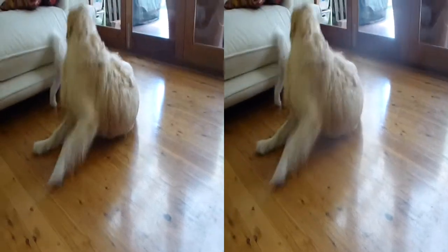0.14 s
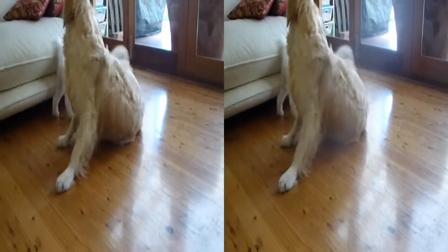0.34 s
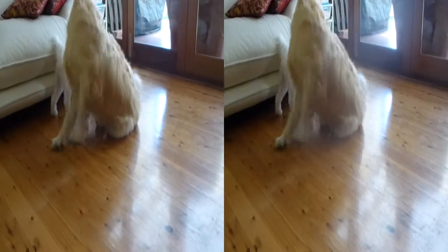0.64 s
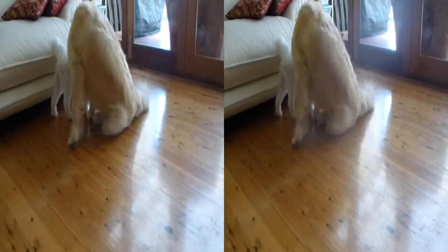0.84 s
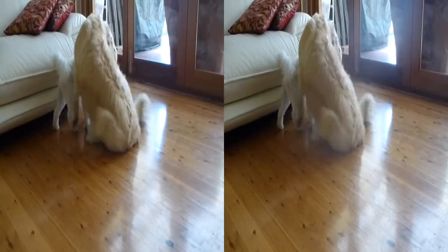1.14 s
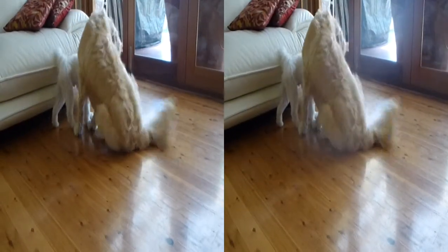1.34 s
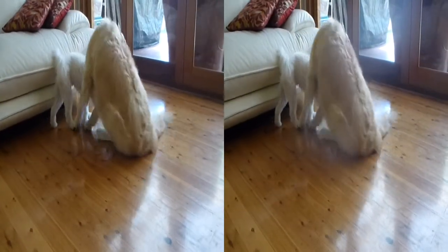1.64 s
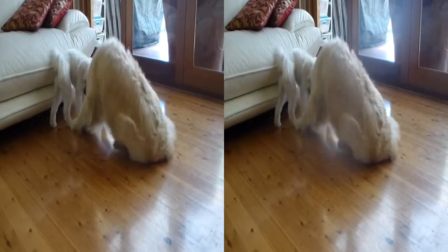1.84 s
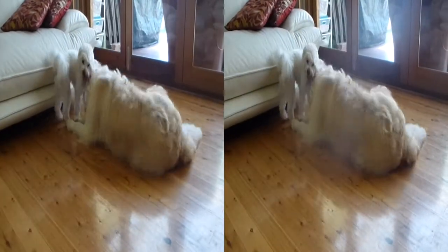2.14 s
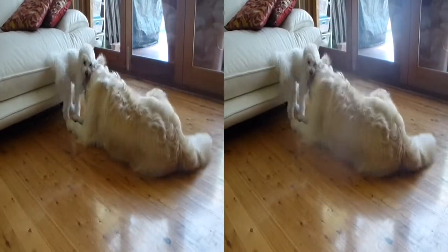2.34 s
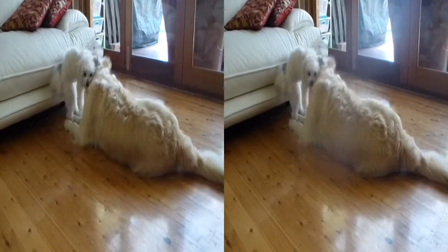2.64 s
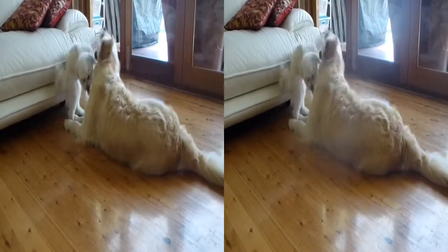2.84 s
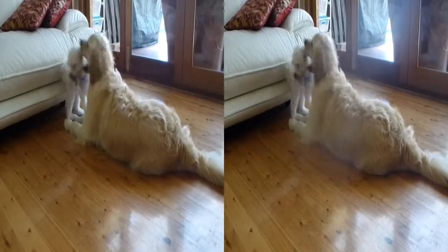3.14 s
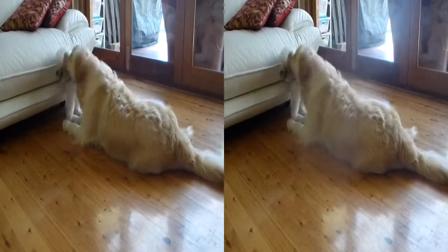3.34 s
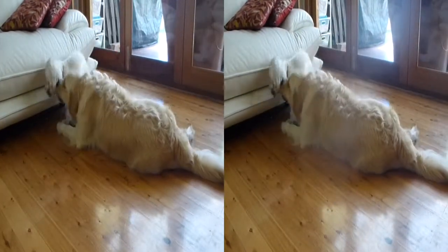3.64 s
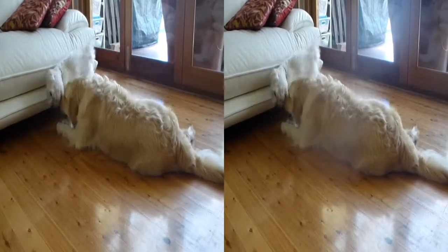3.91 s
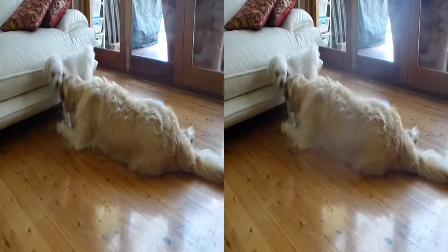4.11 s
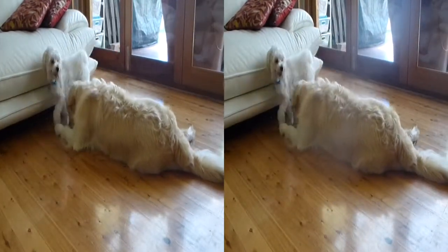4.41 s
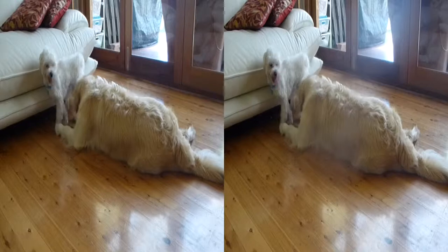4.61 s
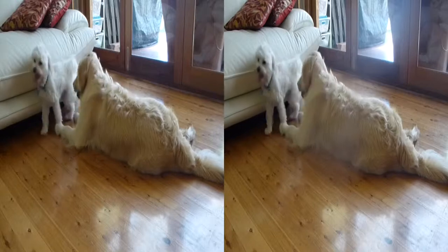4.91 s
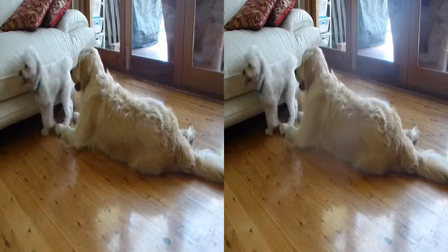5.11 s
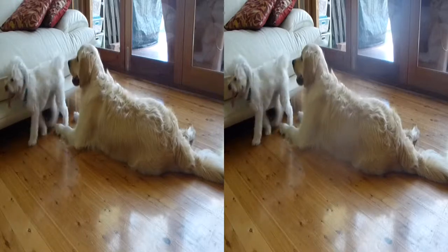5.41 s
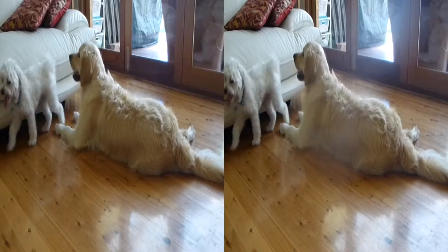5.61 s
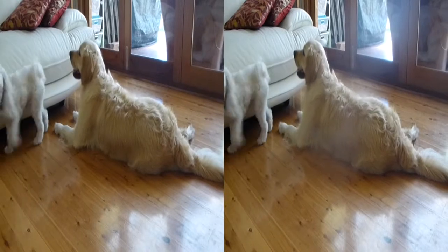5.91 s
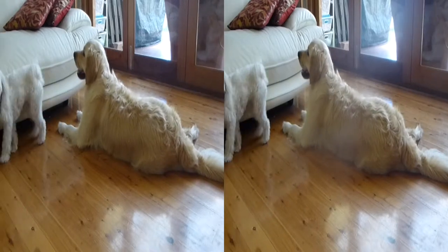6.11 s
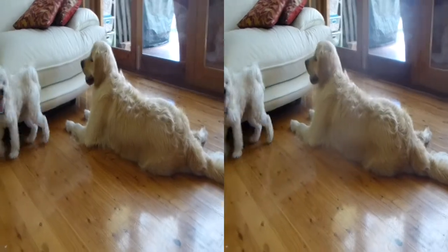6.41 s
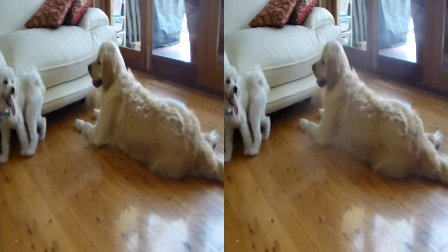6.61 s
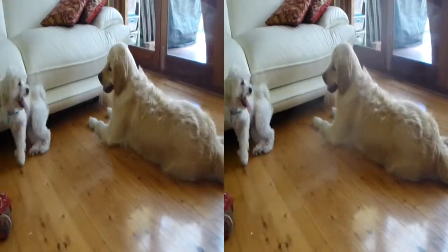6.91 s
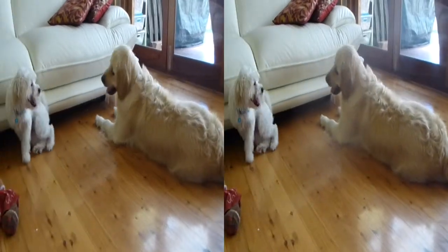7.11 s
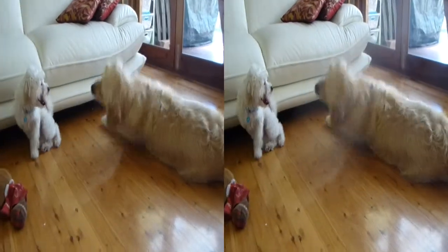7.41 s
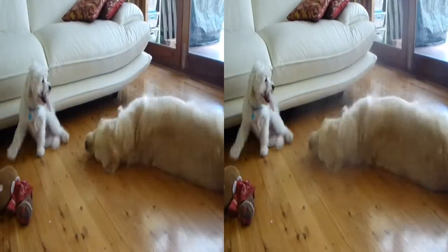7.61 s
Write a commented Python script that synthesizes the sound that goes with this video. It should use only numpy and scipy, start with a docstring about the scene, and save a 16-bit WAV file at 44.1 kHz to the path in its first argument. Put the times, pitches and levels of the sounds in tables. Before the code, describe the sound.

A handheld camera in a lively living room picks up dog claws scratching boards, coarse fur brushing, pad squeaks and dull thuds a few metres away. A thin collar tag tinkles and a dog pants softly in the calmer middle. Something loose clatters on the housing, briefly at the start and near one second, then in dense, very loud bursts at the end. Steady hiss and faint ticking lie beneath.

```python
"""Two dogs scuffle on a wooden living-room floor: claws skid as decaying noise and grit through board resonances,
fur slides as patchy coloured noise, pads squeak and thud, one dog pants up to 6.2 s, a collar tag tinkles.
Right at the hand-held camera, something loose, likely a dangling cap or buckle, chatters on the housing:
these knocks, bright ticks with ringing modes, rebounds and later a low rumble, are the loudest sounds.
Behind lie the room's tail, a dull tick of the camera's drive and hush; the camera widens the stereo picture."""
import sys
import numpy as np
from scipy import signal
from scipy.fft import rfft, irfft
from scipy.io import wavfile
from scipy.ndimage import uniform_filter1d

SR = 44100
rng = np.random.default_rng(int(sys.argv[2]) if len(sys.argv) > 2 else 0)


def store_wav(level_fs):
    """Save 16-bit WAV to argv[1]."""
    pcm = np.round(np.clip(np.atleast_2d(level_fs), -1, 1) * 32767)
    wavfile.write(sys.argv[1], SR, pcm.T.astype(np.int16))


N = 341775  # samples


def gain_of(db):
    """Decibels to amplitude gain."""
    return 10 ** (np.asarray(db) / 20)


def evened(x):
    """Scales to rms 1."""
    return x / np.sqrt(np.mean(x ** 2) + 1e-20)


def read(points, hz):
    """Interpolates (Hz, value) points on a log-frequency axis."""
    point_hz, value = np.transpose(points)
    return np.interp(np.log(hz + 1), np.log(point_hz + 1), value)


def add(mix, s, sound):
    """Mixes a sound in at s seconds, cut at the end of the mix."""
    part = mix[..., round(s * SR):][..., :sound.shape[-1]]
    part += sound[..., :part.shape[-1]]


def resonate(x, hz, width):
    """One damped resonance, with a decaying complex pole, of gain about 1 at its centre."""
    r = np.exp(-np.pi * width / SR)
    return 2 * signal.lfilter([1 - r], [1, -r * np.exp(2j * np.pi * hz / SR)], x).real


def resonate_twice(x, hz, width):
    """Two equal resonances in a row, for steeper skirts."""
    return resonate(resonate(x, hz, width), hz, width)


def coloured(x, db_of, size=256):
    """Filters in short-time spectra by the gain db_of(Hz, s)."""
    overlap = size * 3 // 4
    hz, t, z = signal.stft(x, SR, nperseg=size, noverlap=overlap)
    shaped = z * gain_of(db_of(hz[:, None], t))
    return signal.istft(shaped, SR, nperseg=size, noverlap=overlap)[1][..., :x.shape[-1]]


def grit(per_s, spread_db):
    """Random clicks, a few of them large, as rough surfaces catch and let go."""
    clicks = rng.standard_normal(N) * (rng.random(N) < per_s / SR)
    return clicks * gain_of(spread_db * np.minimum(rng.exponential(1, N), 4))


def swells(rows, rise_db_per_s, fall_db_per_s):
    """Sum of gain curves: each row (start, dB, hold) rises up to its start, holds and falls, straight in dB."""
    t = np.arange(N) / SR
    total = np.zeros(N)
    for s, db, hold, *_ in rows:
        rise = rise_db_per_s * np.maximum(s - t, 0)
        fall = fall_db_per_s * np.maximum(t - s - hold, 0)
        total += gain_of(db - rise - fall)
    return total


def rub(gain, tilt, colour, grain, per_s, patchy_db):
    """Noise and grit under a gain curve, coloured, tilted by (s, dB per octave) and patchy."""
    smooth = (1 - grain) * rng.standard_normal(N)
    drive = smooth + grain * evened(grit(per_s, 3.4))
    # slow random level changes, each in a narrow band
    patches = uniform_filter1d(rng.standard_normal((129, N // 64 + 3)), size=2, axis=0)
    patches = evened(uniform_filter1d(patches, size=16, axis=1))

    def db_of(hz, t):
        slope = np.clip(np.interp(t, *tilt), -3, 5) * np.log2((hz + 200) / 2500)
        return read(colour, hz) + slope + patchy_db * patches[:, :len(t)]

    return evened(coloured(drive, db_of)) * gain


# Paws and claws landing and skidding on the boards.
# Each row: start in seconds, level in dB, favoured frequency in Hz, dying time t60 in seconds.
SKIDS = [(0.303, -37.5, 925, 0.37), (0.485, -43.5, 1290, 0.6), (0.72, -47, 2480, 0.17),
         (0.732, -27.5, 1750, 0.18), (.75, -33, 1470, 0.54), (0.893, -35, 1240, 0.62),
         (1.022, -44, 1560, 1), (1.324, -37, 1500, 0.48), (1.556, -52, 800, 0.63),
         (1.898, -38.5, 4940, 0.59), (1.963, -39, 3980, 0.065), (2.993, -44.5, 3120, 0.52),
         (3.058, -50, 1310, 0.38), (3.449, -53, 606, 1), (3.839, -43, 5900, 0.12), (5.903, -44, 850, 0.052),
         (6.079, -44.5, 950, 0.09), (6.102, -46, 1420, 0.073)]
# Resonances of the floorboards under the claws.
# Each row: frequency in Hz, base width in Hz (broadened in the formula below), level in dB.
BOARDS = [(1130, 150, 14), (2090, 19, 14.5), (2820, 58, 8), (3900, 17, 13), (4950, 72, 9), (6560, 120, -3)]
# skids softer than this are duller; brightness in dB per octave
HARD_SKID_DB, DULLING_PER_DB, BRIGHT_PER_OCTAVE = -40.5, 0.28, 0.91


def skids():
    """A hard contact, then grit that dies away; boards ring under it, and each skid favours its own band."""
    out, size = np.zeros(N), 16384
    hz, t = np.fft.rfftfreq(size, 1 / SR), np.arange(size) / SR
    boards = 0.022
    for board_hz, width, db in BOARDS:
        boards = boards + gain_of(db) / np.sqrt(1 + (2 * (hz - board_hz) / (3.7 * width + 90)) ** 2)
    rough = 0.95 * rng.standard_normal(N) + 0.78 * evened(grit(3500, 1.8))
    low_cut = hz ** 2 / (hz ** 2 + 300 ** 2)
    for s, db, peak_hz, t60 in SKIDS:
        dulling = DULLING_PER_DB * min(db - HARD_SKID_DB, 0)
        tilt = min(dulling + BRIGHT_PER_OCTAVE * np.log2(peak_hz / 2000), 2)
        contact = 1.6 * np.exp(-t / 0.0017)
        scrape = gain_of(-60 * t / max(t60, .01))
        stroke = np.roll(rough, -round(s * SR))[:size] * (scrape + contact) * (1 - np.exp(-t / 0.00059))
        octaves = np.log2((hz + 50) / peak_hz)
        favoured_db = 6.6 * np.exp(-(octaves / 0.41) ** 2)
        shape = boards * gain_of(tilt * octaves + favoured_db) * low_cut
        add(out, s, gain_of(db) * irfft(rfft(stroke) * shape) / np.sqrt(np.mean(shape ** 2)))
    return out


# Fur sliding over the floor.
# Each row: start of full level in seconds, level in dB, hold in seconds, brightness in dB per octave.
SLIDE = [(0.288, -36, .01, -1.2), (1.884, -29, 0.08, -0.4), (2.178, -34.5, 0.036, -2),
         (2.772, -53.5, 0.09, 5), (3.016, -39, .01, 0.5), (3.18, -53.5, 0.22, 0.5),
         (3.536, -50.5, 0.036, 1), (3.863, -45.5, 0.014, 0.9), (4.198, -64.5, 0.37, 4)]
# Spectrum of the sliding fur before the brightness tilt. Each row: frequency in Hz, relative density in dB.
SLIDE_COLOUR = [(59, -65), (100, -24), (206, -20.5), (492, -11), (801, -16), (1360, -6.5), (2990, -8.5),
                (4870, -4.5), (6700, -8), (8640, -6), (10700, -16), (15000, -19.5), (16000, -26)]
SLIDE_RISE_DB_PER_S, SLIDE_FALL_DB_PER_S = 224, 144


def fur():
    """Many hairs catch and slip at once: patchy noise and grit whose brightness glides from slide to slide."""
    stroke = swells(SLIDE, SLIDE_RISE_DB_PER_S, SLIDE_FALL_DB_PER_S)
    tilt = np.transpose(SLIDE)[[0, 3]]
    return rub(stroke, tilt, SLIDE_COLOUR, grain=0.36, per_s=3500, patchy_db=4.2)


# Thin squeaks or swishes as a paw pad drags.
# Each row: start of full level in seconds, level in dB, hold in seconds, frequency in Hz,
# width in Hz of each of two stacked resonances.
SQUEAKS = [(0.488, -52, 0.034, 1213, 90), (0.892, -49, .04, 1210, 38), (2.411, -58.5, .02, 1020, 250),
           (2.586, -61, 0.037, 1100, 200), (2.794, -58, 0.093, 5350, 900), (3.056, -52, 0.11, 1226, 50),
           (3.336, -54.5, 0.028, 1050, 220), (3.517, -59.5, .05, 2580, 120), (3.71, -60.5, .03, 2640, 120),
           (3.923, -62, 0.066, 2530, 300), (4.027, -55.5, 0.057, 3200, 700), (4.58, -56, 0.023, 1030, 120)]
SQUEAK_RISE_DB_PER_S, SQUEAK_FALL_DB_PER_S = 700, 250


def squeaks():
    """Quick uneven slips ring one resonance of the boards."""
    slips, out = grit(3700, 1.7), np.zeros(N)
    for row in SQUEAKS:
        hz, width = row[3:]
        tone = evened(resonate_twice(slips, hz, width))
        out += tone * swells([row], SQUEAK_RISE_DB_PER_S, SQUEAK_FALL_DB_PER_S)
    return out


# Pads thudding on a board.
# Each row: start in seconds, level in dB before the decay, frequency in Hz, t60 in seconds.
THUDS = [(1.318, -23.5, 513, 0.018), (3.448, -47.5, 602, 0.18), (3.471, -43, 303, 0.098)]


def thuds():
    """A soft blow rings one low board mode, a decaying sine with a softened start."""
    out, t = np.zeros(N), np.arange(8000) / SR
    for s, db, hz, t60 in THUDS:
        onset = 1 - np.exp(-t / 0.0011)
        add(out, s, gain_of(db - 60 * t / t60) * np.sin(2 * np.pi * hz * t) * onset)
    return out


# The dog's pants up to 6.2 s; the later rows are soft puffs of background noise between the knocks.
# Each row: moment of the puff's peak in seconds, level in dB.
PUFFS = [(4.79, -63), (5.017, -55), (5.127, -59), (5.293, -58.5), (5.436, -54.5), (5.585, -51.5),
         (5.757, -51.5), (5.9, -52), (6.049, -53), (6.2, -49), (7.04, -54), (7.22, -58), (7.453, -53),
         (7.664, -48.5)]
# Spectrum of the puffs' noise. Each row: frequency in Hz, relative density in dB.
PUFF_COLOUR = [(300, -8.5), (900, -3.5), (1500, -5), (2150, 2), (2800, -7.5), (4200, -4), (5500, -7),
               (7000, -20), (12000, -38)]
PUFF_RISE_S = 0.034
# narrow resonance, in the pants that of the mouth, applied twice; level against the puffs, smoothing time
WHISTLE_HZ, WHISTLE_WIDTH_HZ, WHISTLE_DB, WHISTLE_LINGER_S = 2187, 98, -9, 0.15


def pants_and_noise_puffs():
    """Puffs of noise, quick to rise and slower to fall, with a lingering whistle: pants, later background."""
    flow = np.zeros(N)
    u = np.arange(0, 4, 1 / (PUFF_RISE_S * SR))  # time in rise times
    for s, db in PUFFS:
        add(flow, s - PUFF_RISE_S, gain_of(db) * u * np.exp(1 - u))
    air = evened(resonate_twice(rng.standard_normal(N), WHISTLE_HZ, WHISTLE_WIDTH_HZ))
    linger = np.exp(-1 / (WHISTLE_LINGER_S * SR))
    slow_flow = signal.lfilter([1 - linger], [1, -linger], flow)
    whistle = gain_of(WHISTLE_DB) * air * slow_flow
    return whistle + rub(flow, ([0], [0]), PUFF_COLOUR, grain=0.2, per_s=2000, patchy_db=3)


# Bouts of jingling of the collar tag. Each row: start of full level in seconds, level in dB, hold in seconds.
TAG = [(1.0, -54.5, 0.18), (1.27, -52, 0.13), (2.38, -49.5, 0.031), (2.8, -43.5, 0.068),
       (3.0, -46.5, 0.051), (3.46, -44.5, 0.033), (3.52, -41, 0.008), (4.2, -59, 0.37), (6.18, -46, 0.059),
       (6.88, -45, 0.021)]
# Ringing modes of the tag. Each row: frequency in Hz, t60 in seconds, relative level in dB.
TAG_MODES = [(8150, 0.061, 17), (7920, 0.033, 19.5), (7800, 0.02, 14), (9300, .02, 7)]
TAG_RISE_DB_PER_S, TAG_FALL_DB_PER_S = 304, 136
SNAP_S, SNAP_DB = 3.518, -19.5  # one hard, bright snap of band-passed noise: start, gain on its band-passed noise


def tag():
    """Thin metal tapped again and again by the collar ring; one hard, bright snap is added here as well."""
    t, out = np.arange(4000) / SR, np.zeros(N)
    for hz, t60, db in TAG_MODES:
        ping = gain_of(db - 60 * t / t60) * np.sin(2 * np.pi * hz * t) * (1 - np.exp(-t / 0.00017))
        out += signal.oaconvolve(grit(70, 2.3), ping)[:N]
    out = evened(out) * swells(TAG, TAG_RISE_DB_PER_S, TAG_FALL_DB_PER_S)
    snap = rng.standard_normal(len(t)) * (np.exp(-t / 0.001) + 0.15 * np.exp(-t / .025))
    band = signal.butter(2, (5200, 10500), "band", fs=SR, output="sos")
    add(out, SNAP_S, gain_of(SNAP_DB) * signal.sosfilt(band, snap))
    return out


# Low thuds on the floor; the rows from 6.26 to 7.52 s are low rumble that goes with the camera knocks.
# Each row: start of full level in seconds, level in dB, hold in seconds.
LOW_SOUNDS = [(0.01, -57.5, 0.37), (.75, -52.5, 0.026), (.95, -53.5, 0.039), (1.07, -54.5, 0.091),
              (1.23, -54.5, 0.1), (2.16, -36.5, 0.047), (2.66, -58, 0.0087), (3.03, -60.5, 0.014),
              (3.46, -58, 0.056), (6.26, -53.5, 0.093), (6.47, -54, 0.34), (6.9, -54, 0.3),
              (7.31, -54.5, 0.18), (7.52, -54.5, 0.13), (7.716, -31.5, 0.02)]
# Low resonances. Each row: frequency in Hz, base width in Hz (scaled below), level in dB.
LOW_MODES = [(74, 9.5, -3.5), (110, 21, 1), (132, 23, 8), (162, 32, 3.5), (231, 28.4, -3), (320, 90, -14)]
LOW_RISE_DB_PER_S, LOW_FALL_DB_PER_S = 1500, 157


def low_thuds_and_rumble():
    """Noise through low resonances under a gain curve; quiet moments reach the deepest resonances less."""
    drive, out = rng.standard_normal(N), np.zeros(N)
    force = swells(LOW_SOUNDS, LOW_RISE_DB_PER_S, LOW_FALL_DB_PER_S)
    for hz, width, db in LOW_MODES:
        reach = (force / force.max()) ** (.55 if hz < 145 else 0)
        mode = resonate(resonate(drive, hz, 1.23 * width), hz, 1.7 * width)
        out += gain_of(db) * evened(mode) * reach
    return force * out


# Treble modes of the housing at first contact, right at the microphones.
# Each row: frequency in Hz, level in mid in dB, level in side in dB, t60 in seconds.
TICK = [(1190, -10.5, -39, 0.066), (2500, -11, -17, 0.025), (3470, -4, -5, 0.027), (4870, -5.5, -11, 0.019),
        (7630, -12.5, -25, 0.013), (8500, -5, -20, 0.015), (10600, -17, -28, 0.017),
        (16000, -25, -31, 0.0085)]
TICK_RISE_S = 0.00038


def tick():
    """First contact excites dense treble modes: noise that dies band by band, new at every contact."""
    hz, mid_db, side_db, t60 = np.transpose(TICK)
    f, t, z = signal.stft(rng.standard_normal((2, 1600)), SR, nperseg=64, boundary=None)
    colour = np.array([np.interp(f, hz, mid_db), np.interp(f, hz, side_db)])[..., None]
    decay_db = 60 * (t - t[0]) / np.interp(f, hz, t60)[:, None]
    burst = signal.istft(z * gain_of(colour - decay_db), SR, nperseg=64)[1]
    return burst * (1 - np.exp(-np.arange(burst.shape[1]) / SR / TICK_RISE_S))


# Body modes of the housing, varied a little at every contact.
# Each row: frequency in Hz, t60 in seconds, level in mid in dB, level in side in dB, side phase in radians,
# change in dB when the rim is struck.
HOUSING = [(395, 0.094, -50, 2, 4.5, -3), (537, 0.027, 2, 8.5, 4, -9.5), (658, 0.026, 4, -8, -1.5, -10),
           (989, 0.021, 0.5, 0, 1, 2), (1022, 0.1, -24.5, -20, 1.4, 12.5), (1264, 0.016, -9.5, -12, -1, 3),
           (1600, 0.028, 3, 3, 1.23, 0.5), (2077, 0.022, -10, -2, 1.3, 10),
           (2777, 0.024, -8, -15, 3.5, -12), (3150, 0.027, -7.5, -13, 0.7, -2),
           (3629, 0.0085, -10, -12.5, 2.3, 18), (4837, 0.013, -5.5, -9, 3.2, 11)]


def ring(depth_db, rim):
    """Mid and side ring of the housing; each contact weighs, bends and phases the modes a little differently."""
    t = np.arange(2500) / SR
    hz, t60, mid_db, side_db, side_phase, rim_db = np.transpose(HOUSING)[..., None]
    spreads = np.reshape([2, .4, .3, .022], (4, 1, 1))  # dB, radians, radians, fraction of the frequency
    weigh, phase, skew, bend = rng.standard_normal((4, len(HOUSING), 1)) * spreads
    turn = 2 * np.pi * hz * (1 + bend) * t + phase
    shared_db = depth_db * (hz < 800) + rim * rim_db + weigh - 60 * t / t60
    mid = (gain_of(mid_db + shared_db) * np.sin(turn)).sum(0)
    side = (gain_of(side_db + shared_db) * np.sin(turn + side_phase + skew)).sum(0)
    return np.array([mid, side])


# Knocks of the loose thing on the camera housing.
# Each row: start in seconds, relative level in dB, tick level setting in dB, loss at the first rebound in dB.
KNOCKS = [(0.005, -17, 7.5, 2.5), (0.033, -17, 10, 19), (0.155, -14, 10.5, 10), (0.174, -18, 4, 2),
          (0.192, -21.5, 6, 5), (0.298, -3.5, 6.5, 36), (0.317, -16.5, -1, 9), (0.336, -25, 9, 10),
          (0.346, -22.5, 8, 26), (1.068, -7.5, 6.5, 11), (1.109, -21.5, 3, 24), (1.13, -13, 6, 8),
          (1.148, -20, 2.5, 21), (6.261, -10.5, 4.5, 8), (6.292, -13, 5.5, 25), (6.348, -8, 2, 21),
          (6.469, -5.5, -0.5, 7), (6.499, -11.5, 0, 3), (6.527, -8.5, -4.5, 7), (6.557, -10, 0, 7),
          (6.59, -9.5, -2.5, 5), (6.631, -10, -1, 18), (6.662, -8.5, 0.5, 32), (6.688, -9.5, 0.5, 8),
          (6.715, -9.5, -2, 4), (6.741, -9, -3.5, 8), (6.771, -11, -0.5, 8.5), (6.8, -9.5, -5, 28),
          (6.895, -6.5, 1.5, 20), (6.923, -10, -2, 1.5), (6.951, -9.5, -7.5, 33), (6.97, -11, -4, 5),
          (7.0, -9.5, -5.5, 17), (7.076, -5, -1.5, 19), (7.105, -12, -4.5, 18), (7.13, -4.5, -4, 14),
          (7.161, -10.5, -3, 23), (7.308, -6, 1, 9), (7.333, -13.5, -3, 11), (7.363, -5, -5, 43),
          (7.387, -9, -0.5, 19), (7.52, -2.5, -1.5, 11), (7.549, -10, -6, 22), (7.583, -6, -2.5, 22),
          (7.737, -3.5, 1, 14)]
REBOUND_S = .0095  # mean spacing
RIM_UNTIL_S = 3  # until then the thing strikes the rim, later the broad face
# low modes of the housing: the sharper and harder the knock, the less they share in the ring
DEPTH_DB, DEPTH_PER_TICK_DB, DEPTH_PER_PEAK_DB = -3, -0.3, -0.95


def knocks():
    """A bright tick comes first, the body of the housing swells some 1-2 ms later, then the thing rebounds."""
    out, push = np.zeros((2, N)), signal.windows.hann(12)
    for s, db, tick_db, loss_db in KNOCKS:
        depth_db = DEPTH_DB + DEPTH_PER_TICK_DB * tick_db + DEPTH_PER_PEAK_DB * db
        for bounce in range(3):  # the first contact and two rebounds
            lag = np.zeros(110)  # samples; the blow travels round the shell
            lag[[30, 65, 105]] = [.6, .8, .45] * (1 + .12 * rng.standard_normal(3))
            gain = gain_of(db - bounce ** 2 * loss_db)
            at = s + bounce * REBOUND_S * (1 + 0.061 * rng.standard_normal())
            blow = np.convolve(push, lag)[None]
            swell = signal.fftconvolve(ring(depth_db, s < RIM_UNTIL_S), blow, axes=1)
            add(out, at, gain * 0.17 * swell / np.sqrt(np.mean(swell[0, :600] ** 2)))
            add(out, at, gain * gain_of(tick_db - 0.46 * bounce) * tick())
    # the low end reaches further down in side than in mid
    thinned = []
    for hz, x in zip((370, 220), out):
        thinned.append(signal.sosfilt(signal.butter(5, hz, "high", fs=SR, output="sos"), x))
    return np.array(thinned)


# Dying time of the living room. Each row: frequency in Hz, t60 in seconds.
ROOM = [(150, 0.49), (1000, 0.35), (4000, 0.56), (12000, 0.59)]


def room(x):
    """Mid and side tails: sparse taps of random sign, each band dying at its own speed."""
    taps = np.zeros((2, 30000))
    at = np.arange(120, 29980, 20) + rng.integers(0, 20, (2, 1493))
    np.put_along_axis(taps, at, rng.choice([-1., 1.], at.shape), 1)
    tail = coloured(taps, lambda hz, t: -60 * t / read(ROOM, hz))
    return signal.fftconvolve(x[None], tail / np.linalg.norm(tail[0]), axes=1)[:, :N]


MOTOR_S, MOTOR_DB = .094, -44  # first tick of the camera's drive, gain on its resonances


def motor():
    """A faint dull tick inside the camera, ten times a second, ringing two low resonances."""
    clicks = np.zeros(N)
    clicks[round(MOTOR_S * SR)::SR // 10] = 1
    uneven = clicks * gain_of(1.5 * rng.standard_normal(N))
    soft = np.convolve(uneven, signal.windows.hann(50), "same")
    return gain_of(MOTOR_DB) * (resonate(soft, 195, 260) + 2.0 * resonate(soft, 640, 100))


# Spectrum of the hush common to both channels. Each row: frequency in Hz, relative density in dB.
HUSH_MID = [(24, -38), (40, -2.5), (231, 1.5), (646, -0.5), (733, 3), (852, -1.5), (2150, -5), (2570, -7.5),
            (4030, -6.5), (5720, -6.5), (8130, -3), (14800, -19.5), (16000, -19)]
# Spectrum of the hush opposed between the channels. Each row: frequency in Hz, relative density in dB.
HUSH_SIDE = [(24, -60), (40, -42), (64, -33), (137, -15), (262, -5.5), (491, -6), (680, -8.5), (3300, -29),
             (8990, -31.5), (13400, -44.5), (16000, -43)]
HUSH_MID_DB, HUSH_SIDE_DB = -55, -49.5  # rms before the microphones' roll-off


def hush():
    """Room tone and microphone hiss: steady coloured noise, independent in mid and side."""
    noise = rng.standard_normal((2, N))
    mid = coloured(noise[0], lambda hz, t: read(HUSH_MID, hz), size=2048)
    side = coloured(noise[1], lambda hz, t: read(HUSH_SIDE, hz), size=2048)
    return np.array([gain_of(HUSH_MID_DB) * evened(mid), gain_of(HUSH_SIDE_DB) * evened(side)])


# The camera's widening: gain into the side for sounds out in the room, strongest in the bass.
# Each row: frequency in Hz, gain in dB.
WIDENING = [(60, -20), (150, 13), (380, -14), (950, -16.5), (2380, -17.5), (5980, -16), (15000, -20.5)]


def scene():
    """Dogs through the room and the widening, knocks straight into the housing; mid and side to left and right."""
    floor = skids() + fur() + squeaks() + thuds() + pants_and_noise_puffs() + tag()
    near, low = knocks(), low_thuds_and_rumble()
    wet = room(gain_of(-5) * floor + gain_of(-9.0) * near[0])
    mid = floor + wet[0] + near[0] + low + motor()
    spread = gain_of(9.5) * wet[1] + 0.7 * floor
    side = coloured(spread, lambda hz, t: read(WIDENING, hz), size=1024)
    side += near[1] + gain_of(-18.5) * np.roll(low, 40)  # low thuds and rumble: fainter and later in side
    mid, side = np.array([mid, side]) + hush()
    return np.array([mid + side, mid - side])


EDGE_HZ = 16000  # upper band limit


def record(dry):
    """Bass roll-off of the microphones, full-scale clip, band limit."""
    thin = signal.sosfilt(signal.butter(6, 60, "high", fs=SR, output="sos"), dry)
    low_pass = signal.firwin(511, EDGE_HZ, window=("kaiser", 9), fs=SR)
    return signal.oaconvolve(np.clip(thin, -1, 1), low_pass[None], "same")


dry = scene()
out = record(dry)
store_wav(out)
```